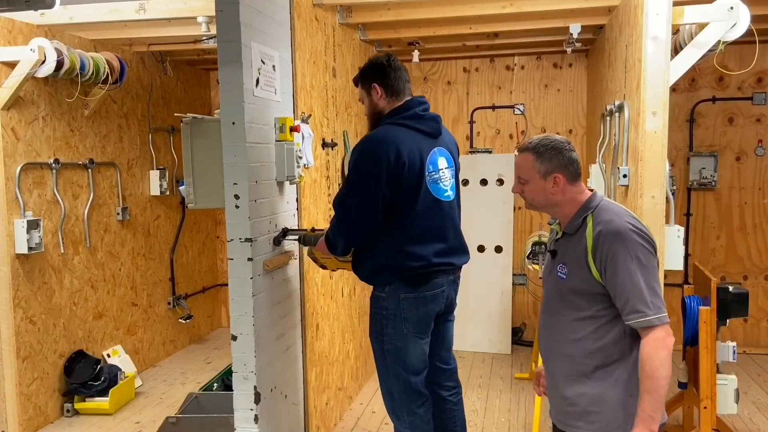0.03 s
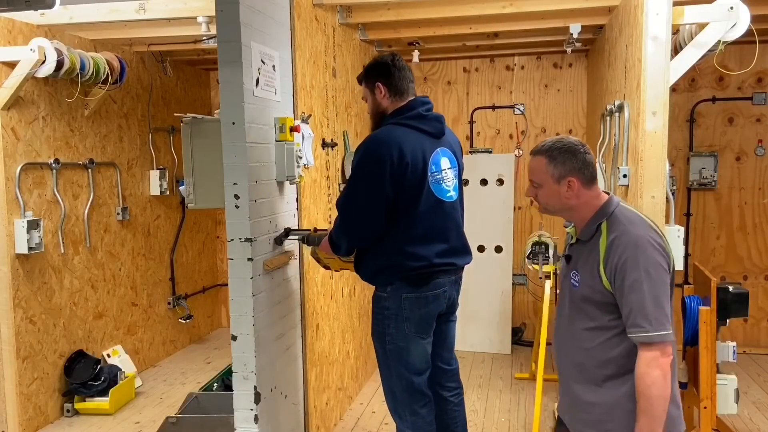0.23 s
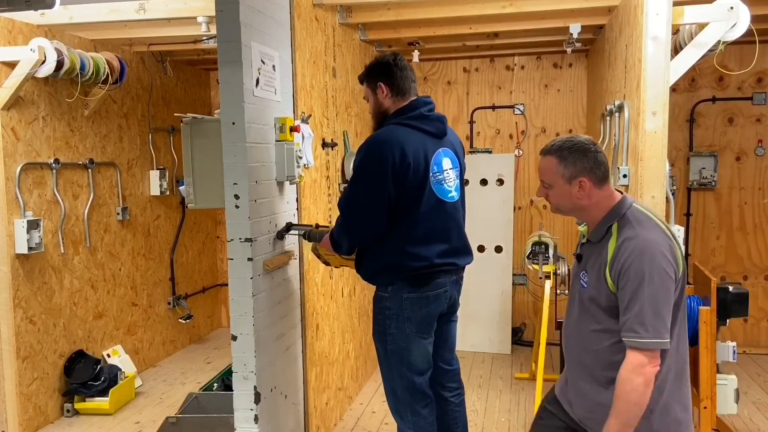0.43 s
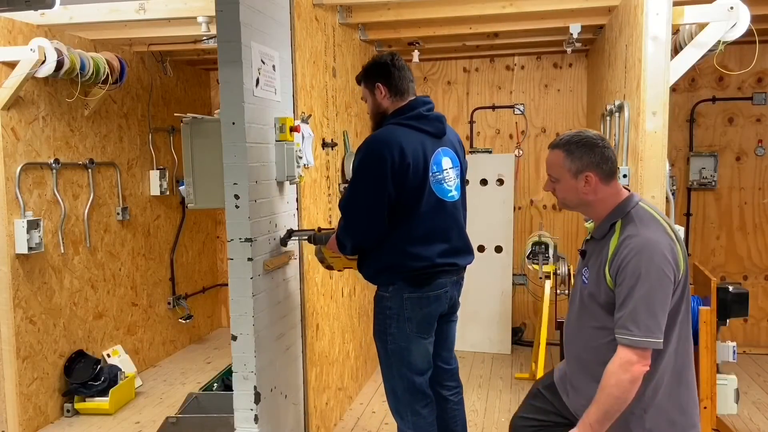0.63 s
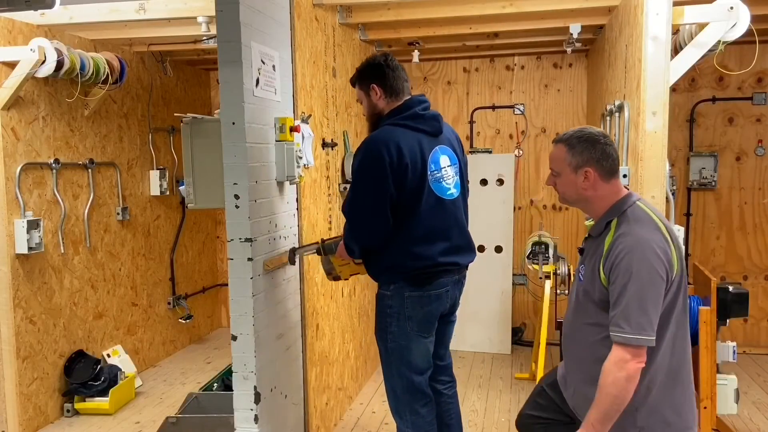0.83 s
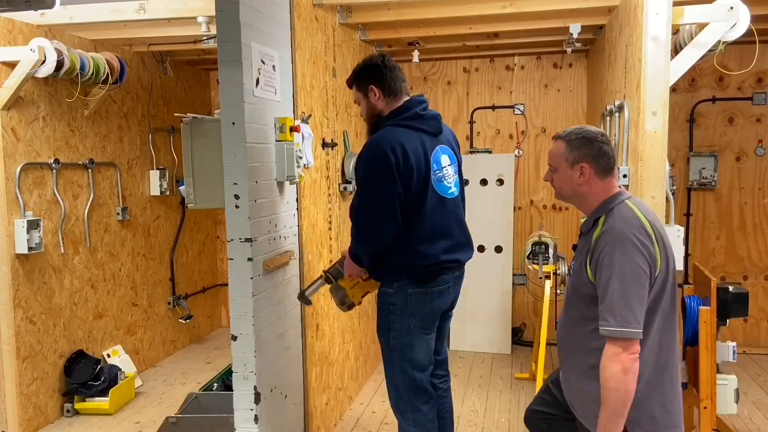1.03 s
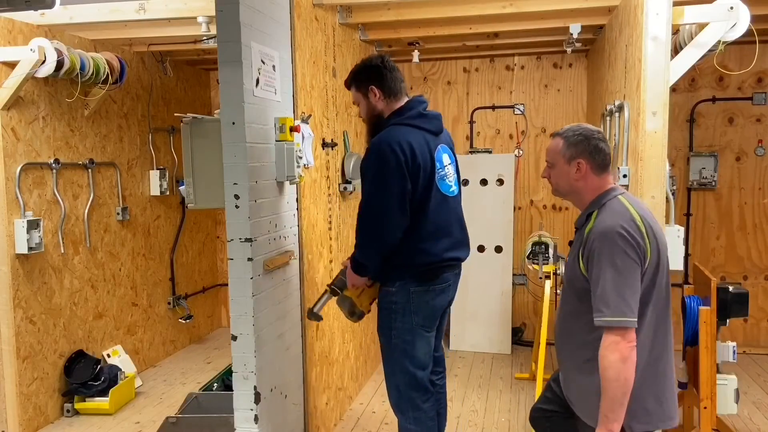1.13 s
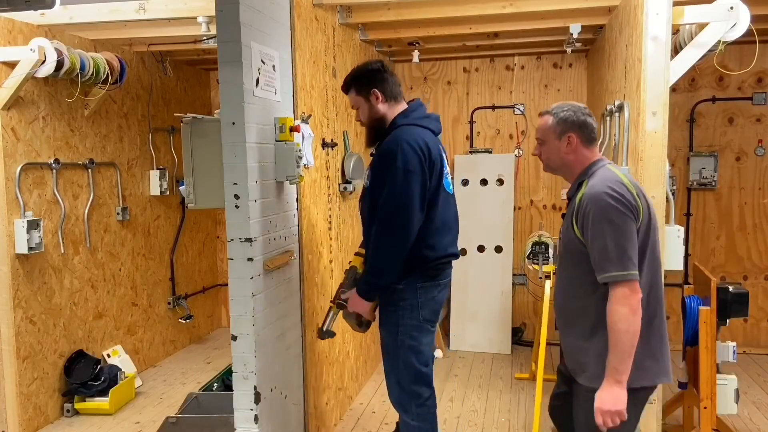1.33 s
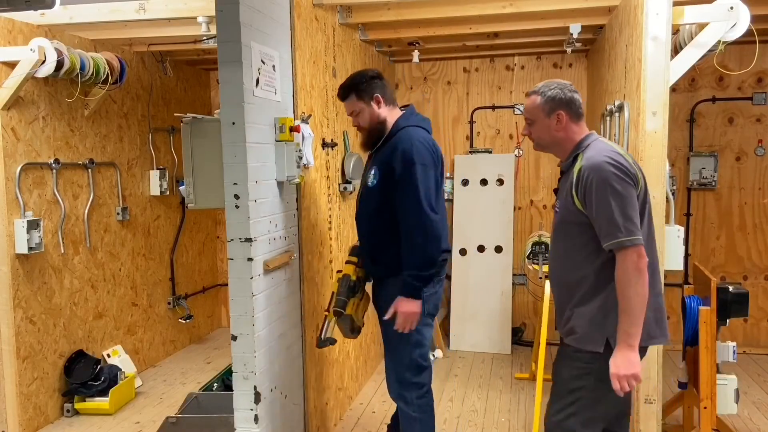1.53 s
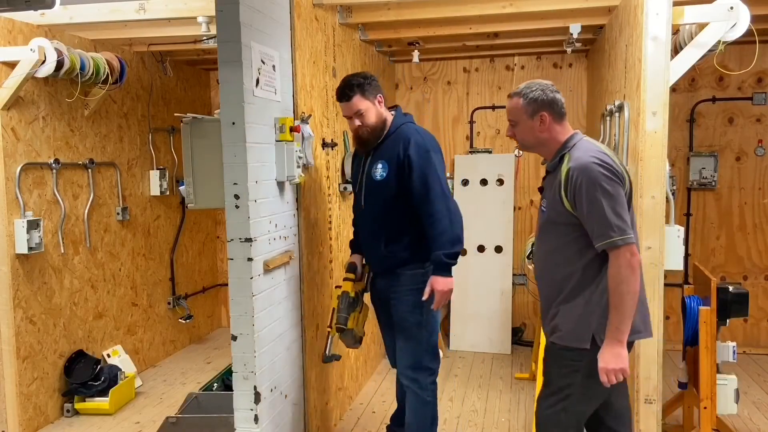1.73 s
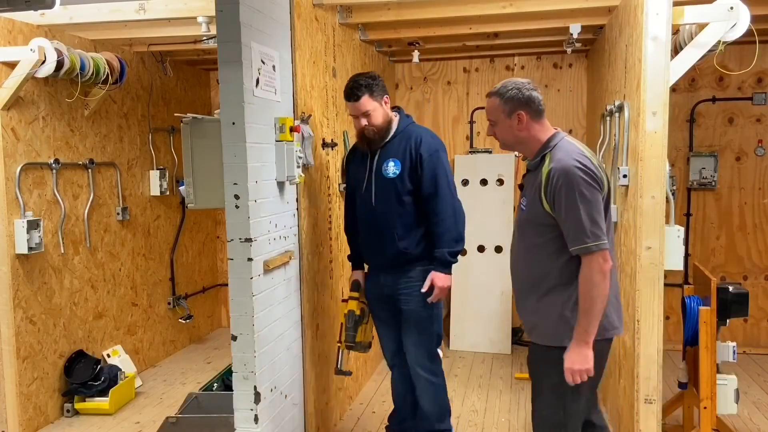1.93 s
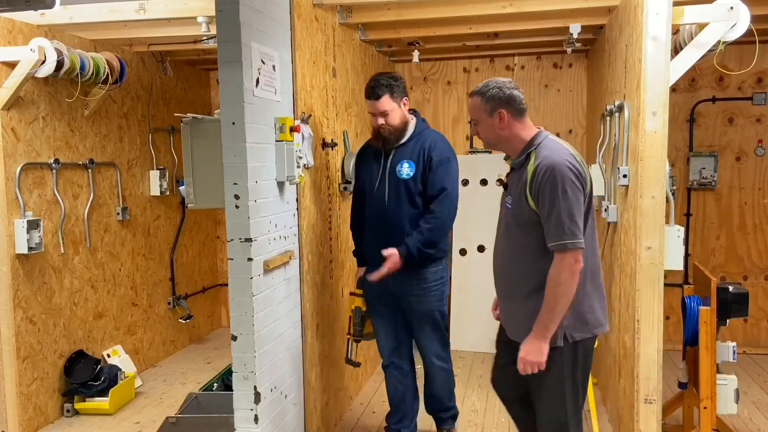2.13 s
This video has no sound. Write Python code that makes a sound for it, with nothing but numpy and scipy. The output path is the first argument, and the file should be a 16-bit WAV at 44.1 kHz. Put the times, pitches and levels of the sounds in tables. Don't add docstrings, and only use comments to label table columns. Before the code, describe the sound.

A cordless drill runs steadily with a roaring fan and whining gears, winds down quickly with small knocks, then clothes swish and shoes shift on a hollow wooden floor in a small workshop.

```python
import sys
import numpy as np
from scipy import signal
from scipy.fft import rfft, irfft, next_fast_len
from scipy.io import wavfile
from scipy.ndimage import uniform_filter1d, map_coordinates

SR = 44100
rng = np.random.default_rng(int(sys.argv[2]) if len(sys.argv) > 2 else 0)


def volts(x):
    e = np.asarray(x, float) / 20
    return 10 ** e


def wav_out(sig):
    wavfile.write(sys.argv[1], SR, np.round(np.clip(np.atleast_2d(sig).T, -1, 1) * 32767).astype(np.int16))


N = 95564


def unit(x):
    return x / np.sqrt(np.mean(x ** 2) + 1e-20)


def curves(rows):
    s, *cols = np.transpose(rows)
    return [np.interp(np.arange(N) / SR, s, c) for c in cols]


def wobble(rate):
    knots = rng.standard_normal(int(N * rate / SR) + 4)
    return map_coordinates(knots, [np.arange(N) * rate / SR])


def filtered(x, response):
    m = next_fast_len(N + SR // 2)
    return irfft(rfft(x, m) * response(np.fft.rfftfreq(m, 1 / SR)), m)[:N]


def along(points, hz):
    f, v = np.transpose(points)
    return np.interp(np.log(hz + 1), np.log(f + 1), v)


def rush(spectrum, patchy_db):
    z = signal.stft(rng.standard_normal(N), nperseg=256)[2]
    field = uniform_filter1d(rng.standard_normal(z.shape), 4, axis=0)
    field = uniform_filter1d(field, 6, axis=1)
    noise = signal.istft(z * volts(patchy_db * unit(field)), nperseg=256)[1][:N]
    return unit(filtered(noise, lambda hz: volts(along(spectrum, hz))))


def peak(hz, centre_hz, wide_hz):
    return 1j * hz * wide_hz / (centre_hz ** 2 - hz * hz + 1j * hz * wide_hz)


def add(track, s, sound):
    part = track[round(s * SR):][:len(sound)]
    part += sound[:len(part)]


# f/Hz, level/dB
AIR_COLOUR = [(15, -35), (25, -18.5), (164, -7), (281, -12.5), (389, -9), (433, -19.5), (537, -9.5),
              (684, -20.5), (15500, -46.5)]
# t/s, level/dB
FAR_HUM = [
    (0, -51.5),
    (.3, -59),
    (.6, -71),
    (1.1, -77),
    (1.7, -67),
    (1.85, -62),
    (2.17, -61.5),
]


def air():
    hum = np.sin(2 * np.pi * 72 * np.arange(N) / SR)
    hum_db = curves(FAR_HUM)[0] + 2 * wobble(7.9)
    return volts(-60.5) * rush(AIR_COLOUR, patchy_db=3) + volts(hum_db) * hum


# f/Hz, time to fall 60 dB/s
ROOM_RING = [(200, 0.48), (2000, 0.36), (10000, 0.25)]


def room(x):
    hz, t, z = signal.stft(rng.standard_normal(SR // 2), SR, nperseg=256)
    fade_db = -60 * t / along(ROOM_RING, hz)[:, None]
    tail = signal.istft(z * volts(fade_db), SR, nperseg=256)[1]
    late = np.pad(x, (250, 0))
    return signal.fftconvolve(late, tail / np.linalg.norm(tail))[:N]


# t/s, level/dB, crispness/dB
SLEEVES = [
    (.75, -66.5, -0.5),
    (.83, -68, 1),
    (.9, -76.5, -0.5),
    (.95, -82, 0),
]
# t/s, level/dB, crispness/dB
TURN = [
    (1.0, -79, -13),
    (1.026, -79.5, -8),
    (1.124, -64.5, -13.5),
    (1.27, -59.5, -10),
    (1.656, -56, -4),
    (1.776, -63, -12.5),
    (1.814, -71.5, -18),
    (1.86, -80, -12),
]
# t/s, level/dB, crispness/dB
LAST_STRIDE = [
    (1.88, -74.5, -12),
    (1.955, -71, 3.5),
    (1.97, -57, -11.5),
    (2.02, -62.5, -2.5),
    (2.17, -55.5, -3.5),
]
# f/Hz, level/dB
SOFT_CLOTH = [(200, -4), (480, -1.5), (1000, -3), (2900, -9), (3500, -12.5), (4700, -14.5), (5400, -25),
              (15600, -36)]
# f/Hz, level/dB
CRISP_CLOTH = [(3500, -32), (5400, -4), (7000, 0), (9000, -4.5), (10500, -16), (15600, -17.5)]
# f/Hz, level/dB
CRISP_STRIDE = [(3000, -29), (6000, -1.5), (8000, 2), (10000, -1), (12500, -1.5), (13500, -6), (15600, -8)]
# f/Hz, width/Hz, level/dB
WEAVE_PEAKS = [(2260, 240, 2.5), (2980, 180, 0.5), (4430, 400, 0)]


def clothes():
    def weave(f):
        return 1 + sum(volts(db - 7.5) * np.abs(peak(f, c, w)) for c, w, db in WEAVE_PEAKS)

    out, t = np.zeros(N), np.arange(N) / SR
    for stroke, crisp in ((TURN, CRISP_CLOTH), (LAST_STRIDE, CRISP_STRIDE), (SLEEVES, CRISP_CLOTH)):
        level_db, crisp_db = curves(stroke)
        outside_s = np.maximum(stroke[0][0] - t, 0) + np.maximum(t - stroke[-1][0], 0)
        level_db = level_db - 150 * outside_s + .8 * wobble(60)
        soft = filtered(rush(SOFT_CLOTH, patchy_db=1), weave)
        out += volts(level_db) * (volts(3) * soft + volts(crisp_db) * rush(crisp, patchy_db=1))
    return out


# t/s, length/s, from f/Hz, to f/Hz, level/dB
WEAVE_SQUEAKS = [
    (1.29, .03, 12300, 12200, -82),
    (1.33, .06, 13900, 15000, -85),
    (1.37, .11, 11400, 12800, -77),
    (1.68, .07, 11500, 9300, -84),
]


def squeaks():
    out = np.zeros(N)
    waver, wander_hz = volts(2.9 * wobble(70)), 130 * wobble(35)
    for s, long_s, from_hz, to_hz, db in WEAVE_SQUEAKS:
        u = np.arange(round(long_s * SR)) / (long_s * SR)
        here = slice(round(s * SR), round(s * SR) + len(u))
        hz = from_hz + (to_hz - from_hz) * u + wander_hz[here]
        swell = np.sin(np.pi * u) ** .4 * waver[here]
        add(out, s, volts(db) * swell * np.sin(2 * np.pi * np.cumsum(hz) / SR))
    return out


# t/s, peak level/dB, favoured f/Hz
SOLE_CONTACTS = [(.885, -48, 560), (0.901, -39.5, 151), (.918, -44, 151), (0.939, -62, 523),
                 (1.04, -53, 160), (1.129, -51.5, 204), (1.385, -46, 594), (1.416, -33.5, 205),
                 (1.44, -41.5, 610), (1.469, -42, 640), (1.491, -34.5, 205), (1.514, -33, 226),
                 (1.542, -45.5, 348), (1.599, -44.5, 171), (1.69, -45, 500), (1.726, -49, 171),
                 (1.793, -45, 170.5), (1.885, -52, 168), (1.91, -50.5, 160), (2.1146, -21, 215),
                 (2.1146, -28, 553), (2.1194, -22, 212), (2.12, -33, 870), (2.128, -31, 1110),
                 (2.13, -41.5, 1900), (1.42, -42.5, 426), (1.501, -49, 520), (1.525, -46.5, 600),
                 (2.139, -28, 205), (2.141, -28.5, 550)]
# f/Hz, level/dB, time to fall 60 dB/s
FLOOR_BOARDS = [(105, -20, 0.13), (160, 2, 0.14), (181.7, -2.5, 0.068), (205, 0, .08), (301, 3.5, 0.089),
                (384, 3, 0.095), (471, -1.5, 0.1), (536, 0, 0.1), (601, 1.5, 0.04), (810, -1.5, 0.068),
                (950, -6, 0.072), (1070, 2, 0.032), (1220, 0, 0.019), (1900, -1, .03)]


def feet():
    out, t = np.zeros(N), np.arange(SR // 4) / SR
    reach_oct, rise_cycles = 0.57, 0.88
    for s, db, near_hz in SOLE_CONTACTS:
        ring = np.zeros(len(t))
        for hz, level, t60 in FLOOR_BOARDS:
            a, b = rng.standard_normal(2)
            share = 1 / (1 + (np.log2(hz / near_hz) / reach_oct) ** 2) ** 2
            ring += volts(level + 2 * a - 60 * t / t60) * share * np.sin(2 * np.pi * hz * (1 + 0.027 * b) * t)
        add(out, s, volts(db - 0.5) * ring * (1 - np.exp(-t * near_hz / rise_cycles)))
    return out


# f/Hz, level/dB, time to fall 60 dB/s
CATCH = [(6778, 2, 0.042), (8900, -12, .04), (11310, -5, .04)]


def catch():
    out, t = np.zeros(N), np.arange(SR // 10) / SR
    ring = sum(volts(db - 60 * t / t60) * np.sin(2 * np.pi * hz * t) for hz, db, t60 in CATCH)
    add(out, .975, volts(-65) * ring)
    return out


# t/s, peak level/dB, centre f/Hz, width over centre
SMALL_TICKS = [(2.117, -40, 1700, 0.36), (2.124, -47, 2030, .3), (2.133, -41, 1770, .3),
               (2.153, -50, 2100, .3), (.739, -58, 12500, .4), (.753, -52.5, 11000, .2),
               (.825, -53, 7300, 0.15), (.915, -56, 5050, .3), (1.136, -73.5, 12500, .4),
               (1.573, -52, 11500, .7), (1.968, -42.5, 2980, 2.5), (2.075, -53, 3500, 0.81)]
# t/s, peak level/dB, f/Hz, width over centre
HOUSING_RINGS = [(.628, -21.5, 871, 0.062), (0.663, -26, 835, 0.105), (.7, -31.5, 790, 0.069),
                 (.74, -36, 890, 0.061), (0.45, -34, 2600, .025), (0.74, -35.5, 2300, 0.025),
                 (0.76, -33.5, 2200, 0.037), (.69, -30.5, 1270, 0.043), (0.66, -45, 2200, 0.045),
                 (.765, -41, 800, .06), (.79, -47, 850, .06)]


def ticks():
    out, t = np.zeros(N), np.arange(SR // 10) / SR
    for s, db, hz, wide in [*SMALL_TICKS, *HOUSING_RINGS]:
        burst = np.zeros(N)
        add(burst, s, volts(-60 * t / 0.01) * rng.standard_normal(len(t)))
        burst = filtered(burst, lambda f: peak(f, hz, wide * hz) ** 2)
        out += volts(db) * burst / np.abs(burst).max()
    return out


# t/s, peak level/dB
TOOTH_KNOCKS = [
    (.58, -38),
    (.601, -42),
    (.624, -35.5),
    (.637, -37.5),
    (.6485, -35.5),
    (.663, -43.5),
    (.679, -39.5),
    (.694, -46),
]
# f/Hz, level/dB, time to fall 60 dB/s
GEAR_RING = [(4530, -2.5, 0.013), (5700, 4.5, .02), (7000, 3, .015), (8800, -8, 0.017),
             (10260, -5.5, 0.018), (12100, -8, 0.015), (14070, -18.5, 0.013)]


def gear_knocks():
    out, t = np.zeros(N), np.arange(SR // 10) / SR
    for s, db in TOOTH_KNOCKS:
        ring = np.zeros(len(t))
        for hz, level, t60 in GEAR_RING:
            a, b = rng.standard_normal(2)
            ring += volts(level + 2.6 * a - 60 * t / t60) * np.sin(2 * np.pi * hz * (1 + 0.016 * b) * t)
        add(out, s, volts(db) * (1 - np.exp(-t / .0004)) * ring)
    return out


FULL_HZ, RELEASE_S = 388.9, .465


def motor():
    slowing_s = np.maximum(np.arange(N) / SR - RELEASE_S, 0)
    speed = np.clip(1 - 900 / FULL_HZ * slowing_s, .02, 1)
    turns = np.cumsum(FULL_HZ * speed * (1 + .0003 * wobble(12))) / SR
    return speed, turns


# f/Hz, level/dB
ROAR_COLOUR = [(35, -56), (60, -27.5), (385, -13.5), (486, -8.5), (773, -5), (2840, -3.5), (3120, -4.5),
               (6870, -14), (15500, -35)]
# f/Hz, width/Hz, level/dB
WHINE_BANDS = [(4606, 150, -10), (5840, 150, -1.5), (6890, 500, -3), (9300, 120, 3.5), (10700, 270, -1.5),
               (11800, 160, 0.5)]


def roar(speed, stroke):
    def whine(f):
        return sum(volts(db) * np.abs(peak(f, c, w)) ** 2 for c, w, db in WHINE_BANDS)

    noise = rush(ROAR_COLOUR, patchy_db=1.5) * stroke
    noise = noise + speed ** 3.6 * filtered(noise, whine)
    treble = filtered(noise, lambda hz: 1 / (1 + (4200 / (hz + 1)) ** 2))
    treble_stays = 0.17
    noise = noise - treble * (1 - treble_stays) * (1 - speed ** 2)
    return np.maximum(speed, .2) ** 0.34 * noise


# f/Hz, width/Hz, level/dB
HOUSING = [(724, 69, 1.5), (800, 98, -1.5), (1500, 370, -2), (2100, 500, -3), (2530, 210, -5)]


def rattle(speed, turns, stroke):
    def housing(f):
        return sum((-1) ** k * volts(db) * peak(f, c, w) for k, (c, w, db) in enumerate(HOUSING))

    tooth = np.floor(3.1 * turns + 1.5 * wobble(300))
    strikes = np.diff(tooth, prepend=0) != 0
    strikes = strikes * rng.uniform(-1, 1, N) * volts(2 * wobble(90))
    shaken = filtered(strikes * stroke ** 2, housing)
    shaken /= shaken[:round(RELEASE_S * SR)].std()
    looser_db = 1 - speed
    return shaken / np.sqrt(np.maximum(speed, .3)) * volts(looser_db)


# f/Hz, level/dB
MOTOR_TONES = [(390.1, -40), (726.5, -38), (780.2, -36), (1015, -43), (1160, -43), (1560.4, -35),
               (1668, -39.5), (2392, -41), (2467, -40), (3047, -35), (3120.8, -29), (3483, -40), (3628, -39),
               (4681, -34),
               (5851.5, -34), (6820, -48), (9362, -51), (11703, -56), (14044, -64)]
# f/Hz, width/Hz, level/dB
HOUSING_SWELLS = [(285, 70, 7), (540, 120, 11), (1400, 160, 9), (2140, 220, 13), (4050, 600, 11)]


def whirring_tones(speed, turns, effort_db):
    coasting = np.arange(N) / SR > RELEASE_S
    grid_hz = np.arange(0, SR / 2, 10)
    answer = sum(volts(db) * np.abs(peak(grid_hz, c, w)) ** 2 for c, w, db in HOUSING_SWELLS)
    tones = np.zeros(N)
    for hz, db in MOTOR_TONES:
        swell = 1 + coasting * np.interp(hz * speed, grid_hz, answer)
        level_db = db + (1.2 + 2.5 * coasting) * wobble(32.01)
        tones += swell * volts(level_db) * np.sin(2 * np.pi * (hz / FULL_HZ * turns + rng.random()))
    crawl_db = 120 * np.maximum(.58 - speed, 0)
    fade_db = np.minimum(effort_db, 0) - 11 * coasting - crawl_db
    return filtered(volts(fade_db + 3) * tones, lambda hz: 1 / (1 + (270 / (hz + 1)) ** 6))


# t/s, level/dB
DRILL_LEVEL = [
    (0.0, -19),
    (0.086, -20.5),
    (0.498, -20),
    (0.63, -25.5),
    (0.636, -23.5),
    (0.748, -42.5),
    (0.798, -61.5),
    (0.9, -64),
]


def drill():
    speed, turns = motor()
    stroke = 1 + 0.13 * np.cos(2 * np.pi * turns / 5.373)
    level_db = curves(DRILL_LEVEL)[0] - 200 * np.maximum(np.arange(N) / SR - DRILL_LEVEL[-1][0], 0)
    noise = volts(-1) * roar(speed, stroke) + volts(-8) * rattle(speed, turns, stroke)
    return volts(level_db) * noise, whirring_tones(speed, turns, level_db - DRILL_LEVEL[1][1])


def scene():
    noise, tones = drill()
    small, steps = ticks() + gear_knocks() + catch(), feet()
    direct = noise + steps + small + tones
    echo = room(noise + 0.65 * steps + .3 * small + .12 * tones)
    return ((direct + volts(-4.5) * echo) * volts(-1.5) + clothes() + squeaks() + air())[None]


def low_pass(x):
    return signal.sosfilt(signal.butter(12, 15640, fs=SR, output="sos"), x)


def record(dry):
    mix = filtered(dry[0], lambda hz: (1j * hz / 32 / (1 + 1j * hz / 32)) ** 2)
    return low_pass(mix[None])


dry = scene()
out = record(dry)
wav_out(out)
```